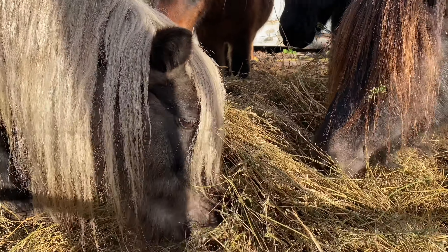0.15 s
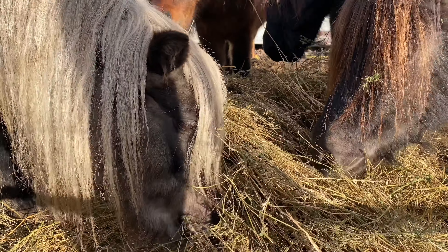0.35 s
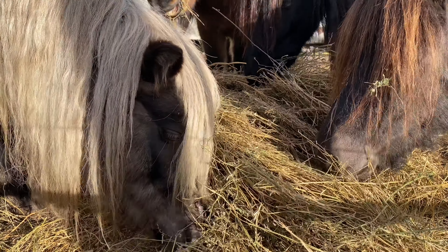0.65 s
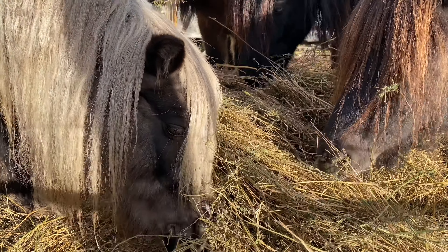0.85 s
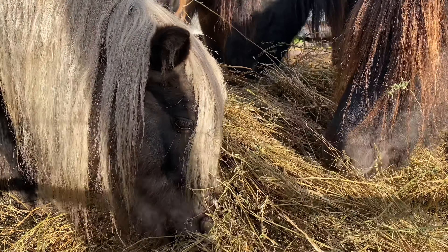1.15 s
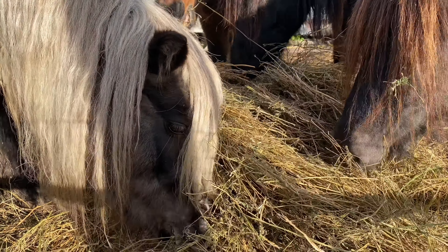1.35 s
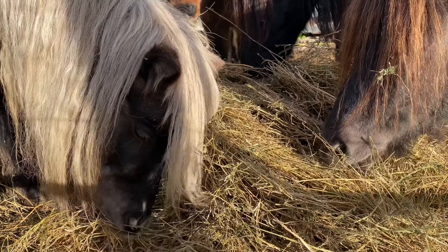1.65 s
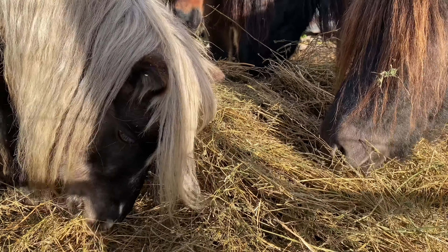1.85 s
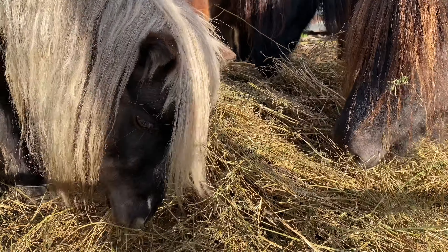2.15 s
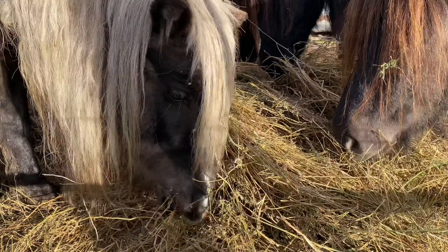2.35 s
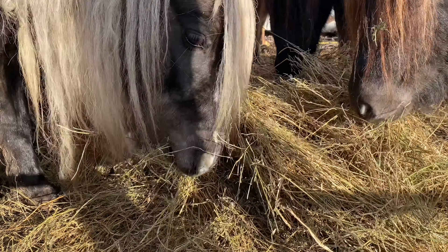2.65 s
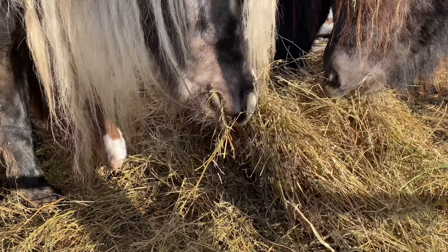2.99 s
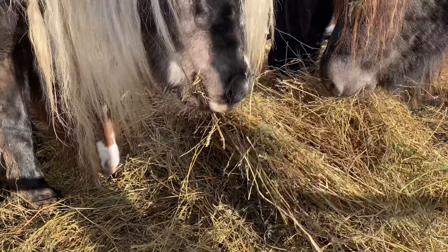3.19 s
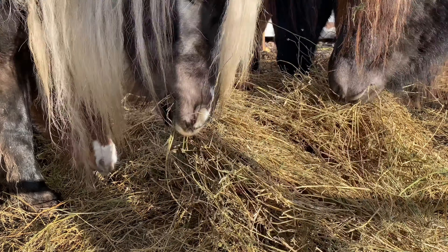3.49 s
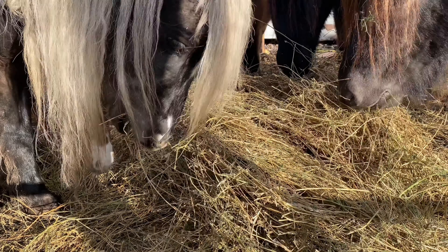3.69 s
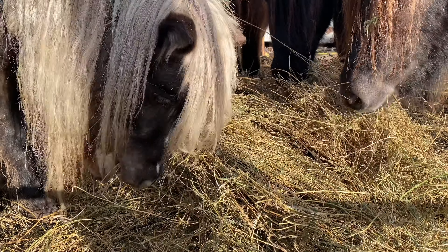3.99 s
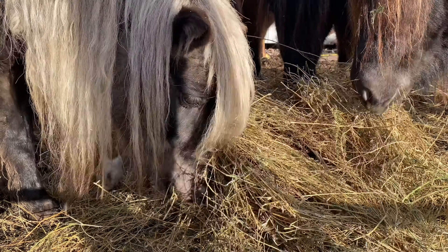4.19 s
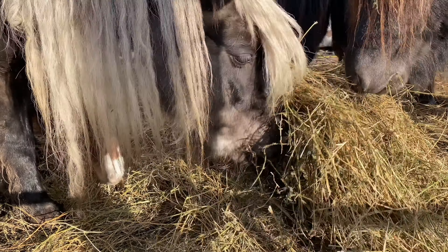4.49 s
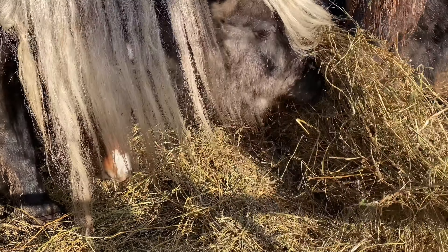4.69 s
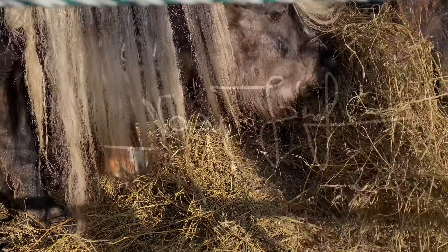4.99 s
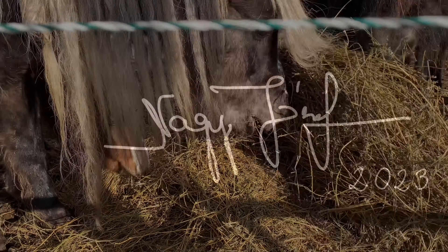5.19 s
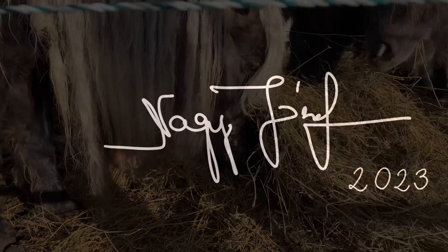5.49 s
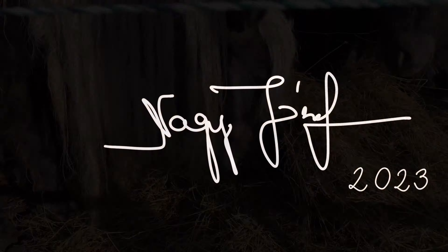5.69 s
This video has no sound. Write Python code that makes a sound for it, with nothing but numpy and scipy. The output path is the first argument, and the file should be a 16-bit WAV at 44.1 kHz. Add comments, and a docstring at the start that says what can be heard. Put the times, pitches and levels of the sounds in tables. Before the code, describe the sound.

Very close, dry farm sound without echo. Strong crunches with soft low thuds come in the first second and a half, more bunch up between two and three and a half seconds, then chewing thins out while hay is tugged and swishes. A few hollow knocks and scraping catches finish the scene over quiet air, followed by a short fade.

```python
"""Stalks crackle between molars as ponies eat hay outdoors, an arm's length from a two-port microphone.
Each stroke of chewing is a swell of tiny breaks, heard dull through the cheeks and crisp between the lips.
Dull, gliding jaw thuds, crunching noise bursts, popping lips and snapping stalks lie over the rustle of
the dry heap and the low stir of the air. Hollow knocks and, late on, rough scrapes reach the ports out of
step. The sound fades out at the end."""
import sys
import numpy as np
from scipy import signal
from scipy.fft import rfft, irfft
from scipy.io import wavfile

SR = 44100
rng = np.random.default_rng(int(sys.argv[2]) if len(sys.argv) > 2 else 0)


def persist_wave(psi):
    """Save psi, clipped to +-1, as 16-bit WAV."""
    counts = np.round(np.clip(psi, -1, 1) * 32767).astype(np.int16)
    wavfile.write(sys.argv[1], SR, np.atleast_2d(counts).T)


N = 257544  # length [samples]
TIME = np.arange(N) / SR  # [s]
FRAMES = TIME[::64]  # slow movements are worked out on a coarse clock [s]
BINS = np.fft.rfftfreq(N, 1 / SR)  # [Hz]
JAW_HZ = 108  # hum of the head, and the pitch on which the thuds settle
CHEW_BUILD = 0.61  # share of a stroke's length spent building up

# strokes of the molars: (time of the hardest press [s], length [s], boom drive [dB], crackle drive [dB])
CHEWS = [(0.005, 0.084, -48, -52), (.235, .14, -50, -57.5), (.58, 0.13, -62, -59), (0.84, .22, -46.5, -52),
         (1.043, 0.11, -67, -62), (1.371, .135, -46, -51), (1.549, .085, -47.5, -55),
         (2.01, 0.077, -49.5, -56.5), (2.2, 0.064, -46, -52), (2.282, .18, -49, -55),
         (2.454, 0.095, -63.5, -60), (2.679, .09, -53, -55.5), (2.834, .095, -46, -50),
         (3.066, 0.1, -79, -59.5), (3.24, .11, -78.5, -60), (3.37, 0.1, -48.5, -51.5),
         (3.456, 0.065, -53, -50.5), (4.056, .115, -47, -51), (4.222, .13, -63, -63),
         (4.862, 0.12, -49, -48), (5.033, 0.085, -60.5, -57.5), (5.142, .05, -54, -54),
         (5.452, 0.12, -55.5, -55.5)]
# colour of stalks breaking at the lips, and of wet lips: (frequency [Hz], level [dB])
STALKS = [(200, -21.5), (450, 3), (750, 1.5), (1100, 1), (1600, 2), (2300, -12), (3100, -10), (4500, -18),
          (7000, -28.5), (16000, -41)]
# colour of a coarse break: (frequency [Hz], level [dB])
BREAK = [(150, -16.5), (450, -2), (850, 3.5), (1500, -4), (2300, -9), (4200, -12.5), (7000, -30),
         (16000, -37)]
# colour of the hollow head shaken by the jaw: (frequency [Hz], level [dB])
HEAD = [(25, -34.5), (45, -5.5), (70, -3.5), (105, -2.5), (140, -5.5), (220, -11.5), (400, -24.5),
        (1200, -64.5)]


def amp(db):
    """Decibels to gain."""
    return 10 ** (np.asarray(db) / 20)


def unit(x):
    """Scales to an rms of one."""
    return x / np.sqrt(np.mean(x ** 2) + 1e-20)


def read(points, hz):
    """Reads a table along a logarithmic frequency axis."""
    f, value = np.transpose(points)
    return np.interp(np.log(hz + 1), np.log(f + 1), value)


def curves(rows):
    """Each column of a time table, sample by sample."""
    s, *columns = np.transpose(rows)
    return [np.interp(TIME, s, c) for c in columns]


def add(mix, s, sound):
    """Mixes a sound in at time s, cut off at the end of the mix."""
    part = mix[..., max(round(s * SR), 0):][..., :sound.shape[-1]]
    part += sound[..., :part.shape[-1]]


def colour(x, spectrum, size=2048):
    """Causal filter of unit energy: clicks keep their sharp front and ring afterwards."""
    log_gain = np.log(amp(read(spectrum, abs(np.fft.fftfreq(size, 1 / SR)))))
    # the Hilbert transform of the log gain gives the minimum phase
    taps = np.fft.ifft(np.exp(np.conj(signal.hilbert(log_gain)))).real
    return signal.fftconvolve(x, taps / np.linalg.norm(taps))[:len(x)]


def drift(rate_hz):
    """Random wandering of unit rms, mostly slower than the rate."""
    spectrum = rfft(rng.standard_normal(N)) / (1 + (BINS / rate_hz) ** 4)
    return unit(irfft(spectrum, N))


def swell(t, rise_s, decay_s):
    """Soft attack and exponential decay, with a peak of one."""
    shape = (1 - np.exp(-(t / rise_s) ** 2)) * np.exp(-t / decay_s)
    return shape / shape.max()


def stroke(s, length_s, build, steep):
    """Force of one movement: it builds up to a peak at time s and lets go again."""
    build = np.clip(build, .1, .9)
    reach_s = length_s * np.where(FRAMES < s, build, 1 - build)
    return 1 / (1 + (abs(FRAMES - s) / reach_s) ** steep)


def effort(strokes, build, steep, rest_db):
    """Gain of a run of strokes (time [s], length [s], level [dB]) over the stirring that never stops."""
    power = sum((amp(db) * stroke(s, length_s, build, steep)) ** 2 for s, length_s, db in strokes)
    return np.interp(TIME, FRAMES, np.sqrt(power + amp(rest_db) ** 2))


def jaw(steep=2.93, rest_db=-78):
    """How hard the molars press, as the gain of the mouth's boom."""
    presses = [(s, length_s, boom_db) for s, length_s, boom_db, _ in CHEWS]
    return effort(presses, CHEW_BUILD, steep, rest_db)


def fractures(per_s, spread_db, clump_db, clump_hz):
    """Tiny breaks of uneven size that come in clumps."""
    size = amp(spread_db * np.minimum(rng.exponential(1, N), 3))
    struck = rng.random(N) < per_s / SR
    clicks = size * rng.choice([-1, 1], N) * struck
    clumps = amp(clump_db * np.clip(drift(clump_hz), -2, 2))
    return unit(clicks * clumps)


def splinters(low_hz, high_hz, per_s, spread_db, cycles, count=40, size=900):
    """Every stalk that cracks rings for a few cycles at a pitch of its own."""
    out, t = np.zeros(N + size), np.arange(size) / SR
    for band in range(count):  # an equal share of the cracks in each band of pitch
        place, pitch, phase, luck = rng.random((400, 4))[:int(per_s * N / SR / count)].T
        hz = (low_hz + (high_hz - low_hz) * (band + pitch) / count)[:, None]
        turns = hz * t[:int(6 * cycles * SR / hz.min())]
        strength = amp(spread_db * np.minimum(-np.log(luck), 4))[:, None]
        rings = strength * np.exp(-turns / cycles) * np.sin(2 * np.pi * (turns + phase[:, None]))
        at = (place[:, None] * N).astype(int) + np.arange(turns.shape[1])
        out += np.bincount(at.ravel(), rings.ravel(), N + size)
    return unit(out[:N])


def grinding(crackle_db=-2, fine_db=-6, splinter_db=-4, crisp_db=-12, steep=2.5, rest_db=-68):
    """The same breaking stalks boom through the cheeks and crackle at the lips; brittle ones crack sharply."""
    # colour of the boom through the cheeks: (frequency [Hz], level [dB])
    mouth_colour = [(30, -28.5), (60, -15), (120, 0.5), (190, -13), (260, 0), (335, 6.5), (410, -2),
                    (500, -27.5), (800, -34), (2000, -70)]
    presses = [(s, length_s, drive_db) for s, length_s, _, drive_db in CHEWS]
    crackle = effort(presses, CHEW_BUILD, steep, rest_db)
    coarse = fractures(per_s=420, spread_db=1, clump_db=3.0, clump_hz=53.7)
    fine = fractures(per_s=2500, spread_db=4.0, clump_db=2, clump_hz=72.3)
    ringing = splinters(low_hz=700, high_hz=2500, per_s=450, spread_db=3.5, cycles=4.5, count=10)
    brittle = splinters(low_hz=2000, high_hz=6000, per_s=140, spread_db=2.5, cycles=2.5, count=6)
    cheeks = unit(colour(coarse, mouth_colour))
    lips = amp(crackle_db) * unit(colour(coarse + amp(fine_db) * fine, STALKS))
    lips += amp(splinter_db) * ringing + amp(crisp_db) * brittle
    return cheeks * jaw() + lips * crackle


def rustling(tick_db=-2, thick_db=-11, swish_db=1, swish_hz=22, bright_hz=8000,
             build=0.54, steep=2.37, rest_low_db=-68.0, rest_top_db=-72):
    """Countless dry stems rub with each tug; some flick free and tick, and the thick ones crack lower."""
    # a muzzle pushes into the heap or pulls a tuft out:
    # (time of the hardest pull [s], length [s], level [dB], top against bottom [dB])
    tug_rows = [(0.012, 0.19, -55, -7), (0.226, 0.23, -59, -1), (0.554, 0.28, -56.5, -6.5),
                (.8, 0.057, -60.5, -11), (0.927, 0.23, -60, -4.5), (1.463, 0.48, -58, -7),
                (1.69, 0.27, -52.5, -1.5), (2.01, 0.18, -60, -9), (2.308, 0.23, -56, -4),
                (2.735, 0.47, -56.5, -2.5), (3.08, 0.18, -63.5, -1), (3.274, 0.17, -58.5, 1),
                (3.445, 0.14, -59.5, -6.5), (3.696, 0.15, -59.5, -3), (4.162, 0.19, -59, -4),
                (4.42, 0.73, -58.5, -1), (4.693, 0.4, -52, -1.5), (5.09, 0.32, -59, -0.5),
                (5.54, 0.46, -60, -2.5)]
    # colour of the dry stems: (frequency [Hz], level [dB])
    straw_colour = [(400, -57), (1500, -11.5), (2500, -12.5), (3300, -2), (4500, -3.5), (5800, -6.5),
                    (7000, -3), (8500, -2), (10500, 1), (12500, -2), (14000, 4), (15700, -1)]
    low_tugs = [(s, length_s, db - bright_db / 2) for s, length_s, db, bright_db in tug_rows]
    top_tugs = [(s, length_s, db + bright_db / 2) for s, length_s, db, bright_db in tug_rows]
    low_gain = effort(low_tugs, build, steep, rest_low_db)
    top_gain = effort(top_tugs, build, steep, rest_top_db)
    rub = fractures(per_s=12000, spread_db=1.5, clump_db=0.5, clump_hz=58)
    ticks = splinters(low_hz=1800, high_hz=15500, per_s=2200, spread_db=3.3, cycles=12)
    thick = splinters(low_hz=900, high_hz=2400, per_s=250, spread_db=3.2, cycles=5, count=8)
    stems = unit(colour(rub + amp(tick_db) * ticks, straw_colour))
    top = irfft(rfft(stems) / (1 + (bright_hz / (BINS + 1)) ** 6), N)
    low = stems - top + amp(thick_db) * thick
    swish = amp(swish_db * drift(swish_hz))
    return swish * (low * low_gain + top * top_gain)


def nudging(level_db=-60.0, follow=0.2, lump_db=3.5, lump_hz=12):
    """Soft, lumpy bumps of the working muzzle, stronger while the jaw grinds."""
    boom_db = 20 * np.log10(jaw())
    gain_db = level_db + follow * (boom_db - boom_db.mean()) + lump_db * drift(lump_hz)
    return amp(gain_db) * unit(colour(rng.standard_normal(N), HEAD))


def air(level_db=-65, gust_db=2.0, gust_hz=7):
    """Low, uneven stir of the open air: coloured noise whose level wanders."""
    # colour of the stirring air: (frequency [Hz], level [dB])
    air_colour = [(20, -38), (35, -9), (50, 15.5), (100, -0.5), (180, -7), (400, -8.5), (800, -24),
                  (1400, -11.5), (3000, -31.5), (16000, -36)]
    return amp(level_db + gust_db * drift(gust_hz)) * unit(colour(rng.standard_normal(N), air_colour))


def feeding():
    """The running sound of the ponies at the heap."""
    return grinding() + rustling() + nudging() + air()


def crunches(rise_s=0.0012, decay_s=0.0038, after_db=-24, after_s=0.075, ring=0.4, rasp=0.28,
             treble_hz=2200, size=3000):
    """A bundle gives way in a burst of a few milliseconds that rings the mouth, with stragglers behind it."""
    # a bundle of stalks breaks in the mouth:
    # (time [s], drive of ring and rasp [dB], gain of the treble [dB], pitch of the mouth cavity [Hz])
    crunch_rows = [(0.2514, -24, 5, 1080), (0.266, -40, 14.5, 1740), (.788, -30, 2.5, 820),
                   (0.903, -31, 10, 860), (1.2906, -34.5, 3, 2250), (1.316, -43, 2, 1510),
                   (1.333, -32.5, -10, 1450), (1.396, -28.5, 1, 1500), (1.547, -35, -4, 955),
                   (2.157, -40.5, 13, 1370), (2.1985, -31.5, -2, 990), (2.241, -30.5, -0.5, 1095),
                   (2.307, -35.5, -17, 976), (2.793, -26.5, -2.5, 1504), (2.836, -29.5, 2, 755),
                   (2.851, -22, -16, 847), (2.875, -31.5, -8, 1490), (3.353, -34, -11, 1260),
                   (3.393, -36.5, 10, 990), (3.416, -46.5, 19, 1550), (3.459, -34.5, -12, 1560),
                   (4.033, -35.5, -6, 1118), (4.079, -37.5, -5, 1010), (4.796, -34.5, 0, 1690),
                   (4.8335, -37, 2, 1480), (4.875, -34, 1, 1830), (5.139, -35.5, 0, 710),
                   (5.2775, -40, -0.5, 2670), (5.43, -43, 8.5, 1590)]
    out, t = np.zeros(N), np.arange(size) / SR
    shape = swell(t, rise_s, decay_s)
    stragglers = amp(after_db) * np.exp(-t / after_s)
    for s, db, treble_db, hz in crunch_rows:
        burst = colour(rng.standard_normal(size) * (shape + stragglers), BREAK)
        dull = signal.lfilter(*signal.butter(1, treble_hz, fs=SR), burst)
        noise = dull + amp(treble_db) * (burst - dull)
        cavity = shape * np.sin(2 * np.pi * hz * t)
        add(out, s, amp(db) * (ring * cavity + rasp * noise))
    return out


def thuds(rise_s=0.0024, head_rise_s=0.0019, head_s=0.016, shudder=0.41, size=8000):
    """The mouth rings low, its pitch gliding as the jaw settles; the head hums and shudders with it."""
    # the jaw closes: (time [s], level [dB], first pitch [Hz], glide time of the pitch [s],
    # decay time of the mouth [s], hum of the head against the mouth [dB])
    thud_rows = [(0.255, -18.5, 242, 0.021, 0.003, -9.5), (.863, -29.5, 240, 0.11, 0.0067, -7),
                 (0.905, -20, 322, 0.83, 0.0079, -8), (1.399, -24.5, 290, 0.013, 0.005, -5),
                 (1.555, -44.5, 254, 0.058, 0.0035, 3), (2.203, -36, 333, 0.092, 0.0055, -26),
                 (2.314, -34, 335, 0.051, 0.0075, -8), (2.795, -33, 321, 0.13, 0.013, -20),
                 (2.84, -36, 308, 0.1, 0.0036, 1), (2.857, -38, 198, 0.015, 0.0042, 6.5),
                 (3.395, -32, 225, 0.0167, 0.014, -1), (4.059, -44, 188, 0.023, 0.023, 7.5),
                 (4.844, -43.5, 133, 0.051, 0.025, 5), (4.873, -37, 373, 0.13, 0.015, -8),
                 (4.898, -40.5, 149, 0.027, 0.021, -2), (5.139, -39, 212, 0.011, 0.015, 2),
                 (5.319, -38.5, 69.3, 0.057, 0.0081, -7)]
    out, t = np.zeros(N), np.arange(size) / SR
    for s, db, hz, glide_s, decay_s, head_db in thud_rows:
        turns = np.cumsum(JAW_HZ + (hz - JAW_HZ) * np.exp(-t / glide_s)) / SR
        mouth = swell(t, rise_s, decay_s) * np.sin(2 * np.pi * turns)
        hum = np.sin(2 * np.pi * JAW_HZ * t)
        shake = shudder * unit(colour(rng.standard_normal(size), HEAD))
        head = swell(t, head_rise_s, head_s) * (hum + shake)
        add(out, s, amp(db) * (mouth + amp(head_db) * head))
    return out


def pops(rise_s=0.00065, decay_s=0.0037, size=1500):
    """Parting lips and hollow stems ring a small cavity for a few cycles, with a wet edge of noise."""
    # lips pop and hollow stems click: (time [s], level [dB], pitch [Hz], wetness [0-1])
    pop_rows = [(0.3933, -44.5, 2030, 0.7), (0.402, -38.5, 1740, 0.36), (0.426, -37, 1640, 0.07),
                (.4265, -39.5, 2190, 0.4), (.985, -44, 570, 0), (1.774, -43, 986, 0.24),
                (1.897, -41, 2250, 0.12), (1.898, -37.5, 3460, 0.13), (1.967, -44.5, 2370, 0.3),
                (1.978, -46, 1970, 0.8), (2.0974, -49.5, 1750, 0.85), (2.5078, -37, 1556, 0.05),
                (2.88, -44.5, 4460, 0.2), (3.0752, -46, 1030, 0), (3.1607, -46.5, 1560, 0.2),
                (3.9131, -49, 1730, 0.9), (4.3178, -45, 1650, 0.07), (4.418, -42.5, 1550, 0.26),
                (4.5303, -41, 1184, 0.34), (4.565, -50.5, 1000, 1), (4.597, -44.5, 554, 0.2),
                (4.659, -44, 500, 0.15), (5.033, -53.5, 4630, 0.2), (5.54, -45, 1150, 0.65)]
    out, t = np.zeros(N), np.arange(size) / SR
    for s, db, hz, wet in pop_rows:
        ring = np.sin(2 * np.pi * hz * t) + wet * colour(rng.standard_normal(size), STALKS)
        add(out, s, amp(db) * swell(t, rise_s, decay_s) * ring)
    return out


def snaps(trim_db=-2, decay_s=.001, size=1200):
    """A single dry stalk breaks in the open with a bright tick of decaying noise."""
    # dry stalks snap: (time [s], level ahead of the trim [dB])
    snap_rows = [(0.426, -24), (0.5203, -28), (2.3206, -36), (2.6522, -33), (2.736, -36), (2.8806, -40),
                 (3.2904, -37.5), (3.4387, -40), (4.0245, -36), (4.1233, -38), (4.7599, -28)]
    # colour of a snap: (frequency [Hz], level [dB])
    snap_colour = [(600, -27), (1800, 4), (4500, -0.5), (8000, 1), (11000, -3.5), (16000, 8)]
    out, t = np.zeros(N), np.arange(size) / SR
    for s, db in snap_rows:
        tick = colour(rng.standard_normal(size) * np.exp(-t / decay_s), snap_colour)
        add(out, s, amp(db + trim_db) * tick)
    return out


def knocks(tail_rise_s=0.006, tail_db=-24, tail_s=0.025, rough_hz=110, rasp=0.035, size=4000):
    """A hollow resonance is knocked and rattles on roughly; it reaches the two ports out of step."""
    # hollow knocks: (time [s], level ahead of the bass cut [dB], pitch [Hz], rise [s], decay [s],
    # left-right balance [dB], lead of the left port [rad])
    knock_rows = [(.8525, -27.5, 860, .003, .0016, 10, 2.6), (4.833, -34, 805, .004, .0016, 8, -2.6),
                  (4.857, -33, 730, .002, .003, 6, 3.4), (4.973, -35, 790, .002, .002, -3, -.3),
                  (4.9993, -21.5, 705, .001, .0042, 1, 3.55), (5.0225, -35, 690, .003, .005, 1, 2.8),
                  (5.034, -31, 680, .004, .0045, 1, 2.8), (5.065, -43, 720, .004, .006, 2, 2.4),
                  (5.2765, -16.5, 790, .006, .0012, 0, 2.2), (5.296, -38, 720, .006, .007, 0, 2.8),
                  (5.3152, -26, 810, .006, .0012, 0, 1.6), (5.431, -35.5, 730, .004, .004, 1, 2.2)]
    out, t = np.zeros((2, N)), np.arange(size) / SR
    for s, db, hz, rise_s, decay_s, pan_db, lead in knock_rows:
        blow = swell(t, rise_s, decay_s)
        rattle = unit(signal.lfilter(*signal.butter(2, rough_hz, fs=SR), rng.standard_normal(size)))
        phase = 2 * np.pi * hz * t - np.array([[0], [lead]])
        knock = blow * (np.sin(phase) + rasp * colour(rng.standard_normal(size), BREAK))
        tail = amp(tail_db) * swell(t, tail_rise_s, tail_s) * rattle * np.cos(phase)
        port_gains = amp([[db + pan_db / 2], [db - pan_db / 2]])
        add(out, s, port_gains * (knock + tail))
    bass_cut = signal.butter(2, 430, "highpass", fs=SR, output="sos")  # a small cavity radiates no bass
    return signal.sosfilt(bass_cut, out)


def scrapes(build=0.4, steep=2, rest_db=-80):
    """Something drags and catches beside the microphone, reaching the two ports in opposite phase."""
    # rough scrapes: (time of the hardest push [s], length [s], level [dB])
    scrape_rows = [(5.04, 0.18, -52), (5.3, 0.062, -55.5), (5.43, 0.11, -54)]
    # colour of a scrape: (frequency [Hz], level [dB])
    scrape_colour = [(100, -13.5), (400, -2.5), (750, -1.5), (1300, -9.5), (2200, -19), (5000, -29),
                     (16000, -53.5)]
    breaks = fractures(per_s=1400, spread_db=2.0, clump_db=4.5, clump_hz=60.7)
    catches = unit(colour(breaks, scrape_colour))
    return np.array([[1], [-1]]) * effort(scrape_rows, build, steep, rest_db) * catches


def pair(direct, diffuse):
    """Two microphone ports share the direct sound and get the diffuse sound in opposite phase."""
    # likeness of the ports: (frequency [Hz], correlation ahead of the lead [0-1])
    likeness = [(50, .5), (120, .72), (300, .85), (2300, .86), (3500, .55), (4800, .65), (6000, .58),
                (9500, .7), (11000, .95), (12200, .75), (15500, .88)]
    # lead of the left port: (frequency [Hz], phase [rad])
    left_lead = [(2600, 0), (3400, 2.5), (4300, 6.3), (7500, 6.1), (8400, 9.1), (9600, 7.9), (10500, 6.3),
                 (11600, 6.2), (13200, 3.2), (14300, 2.5), (15300, 0)]
    # left-right balance: (frequency [Hz], level [dB])
    balance = [(60, -1), (200, -2.5), (1200, -4), (2400, -1), (4400, 1), (8000, 0)]
    same = np.clip(read(likeness, BINS), 0, 1)
    mid = np.sqrt((1 + same) / 2) * rfft(direct)
    side = np.sqrt((1 - same) / 2) * rfft(diffuse)
    tilt = amp(read(balance, BINS) / 2)
    left = (mid + side) * tilt * np.exp(1j * read(left_lead, BINS))
    right = (mid - side) / tilt
    return irfft(np.array([left, right]), N)


def scene():
    """Everything is close and dry; the heap swallows echoes."""
    direct = feeding() + crunches() + thuds() + pops() + snaps()
    return pair(direct, feeding()) + knocks() + scrapes()


def record(dry):
    """The microphone sheds the deepest rumble; then the closing fade and the band limit."""
    # closing fade: (time [s], gain [dB])
    fade_rows = [(5.4, -0.5), (5.56, -11), (5.68, -17.5), (5.78, -21), (5.83, -48.5)]
    fade_db, = curves(fade_rows)
    rumble_cut = signal.butter(3, 33, "highpass", fs=SR, output="sos")
    lean = signal.sosfilt(rumble_cut, dry)
    low_pass = signal.firwin(511, 15900, window=("kaiser", 9), fs=SR)  # upper band edge [Hz]
    return signal.oaconvolve(lean * amp(fade_db), low_pass[None], "same")


dry = scene()
out = record(dry)
persist_wave(out)
```